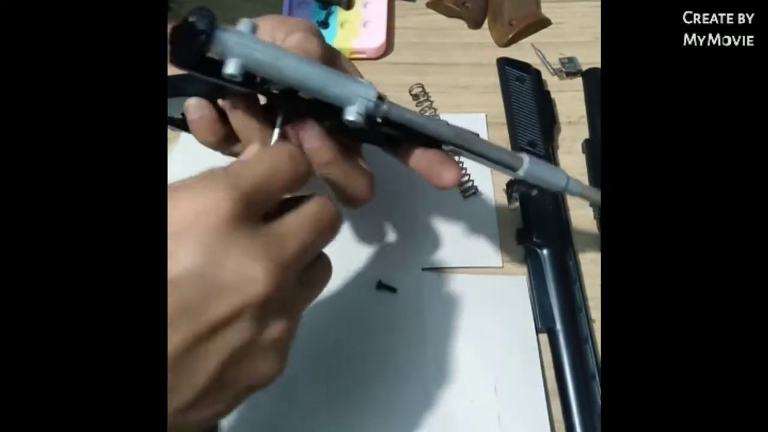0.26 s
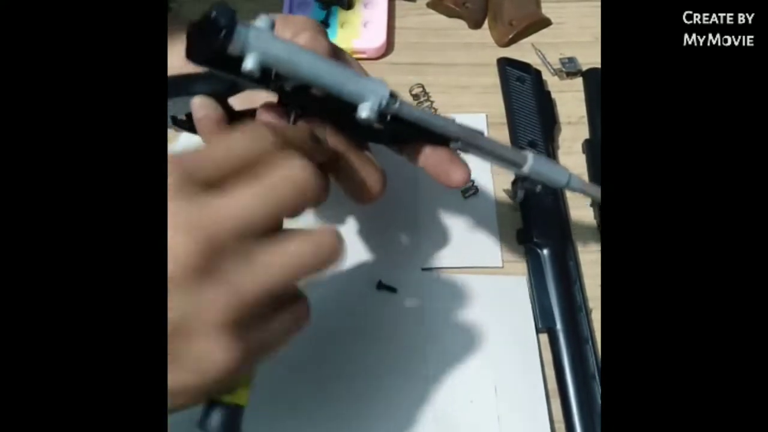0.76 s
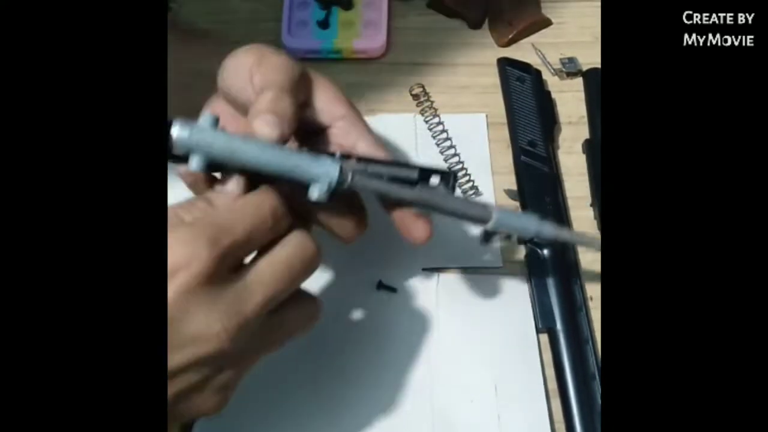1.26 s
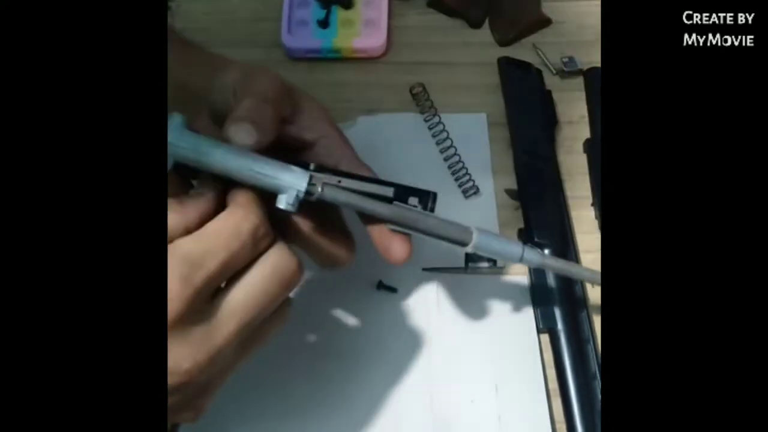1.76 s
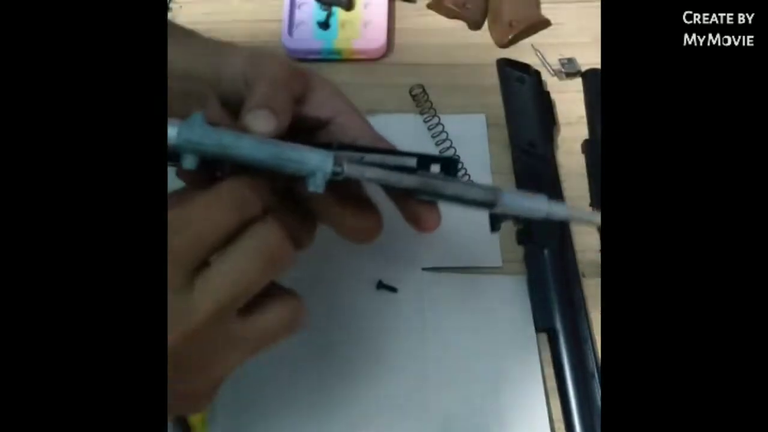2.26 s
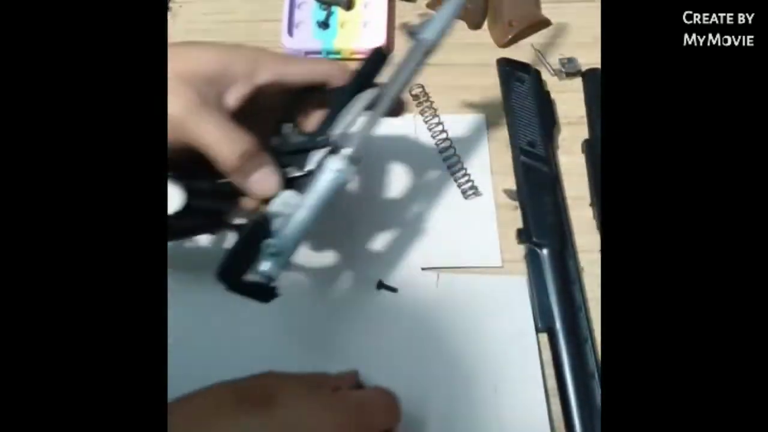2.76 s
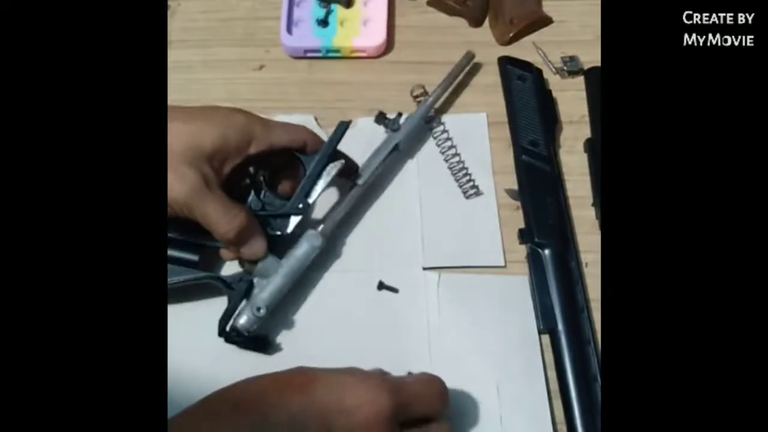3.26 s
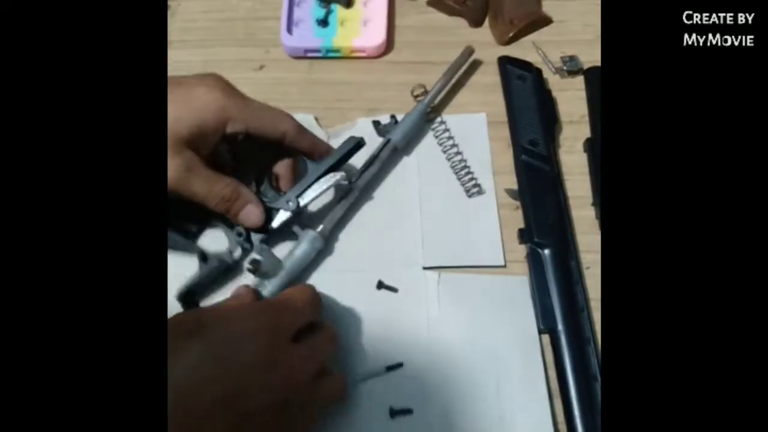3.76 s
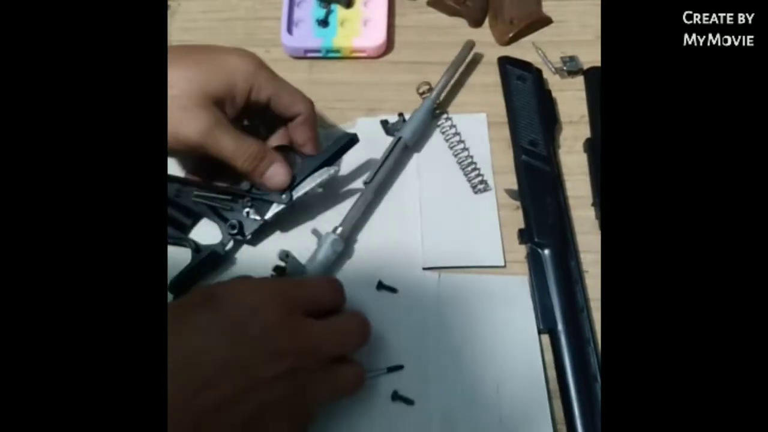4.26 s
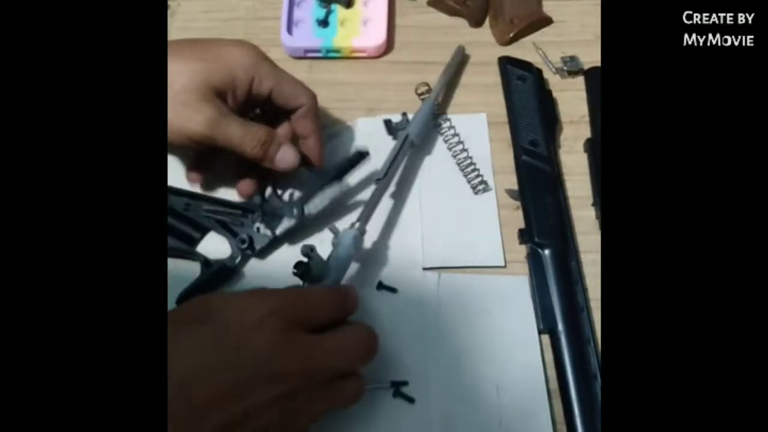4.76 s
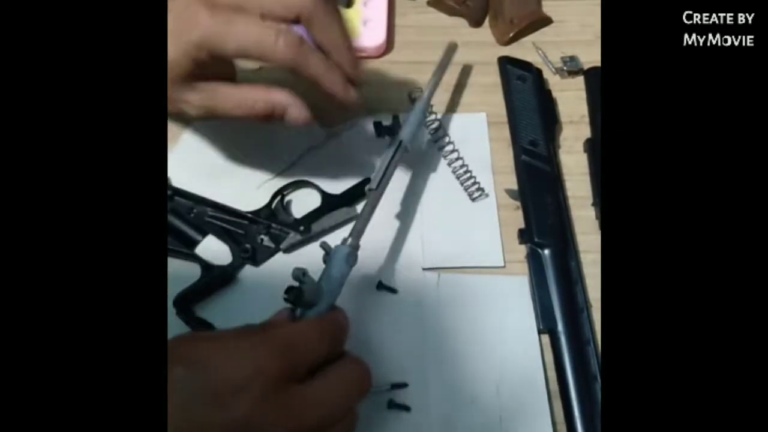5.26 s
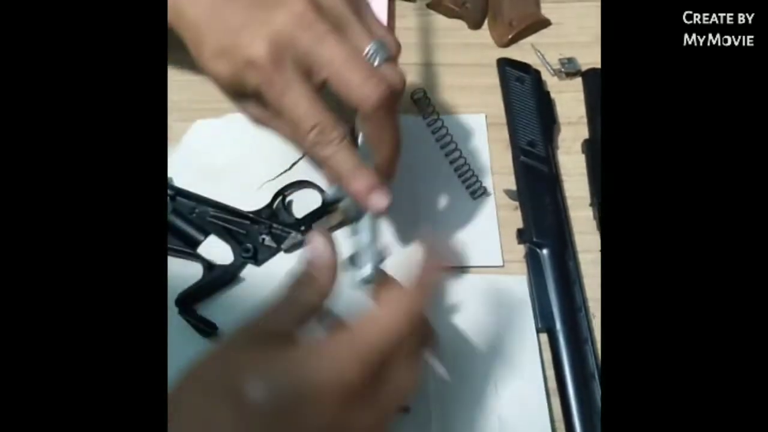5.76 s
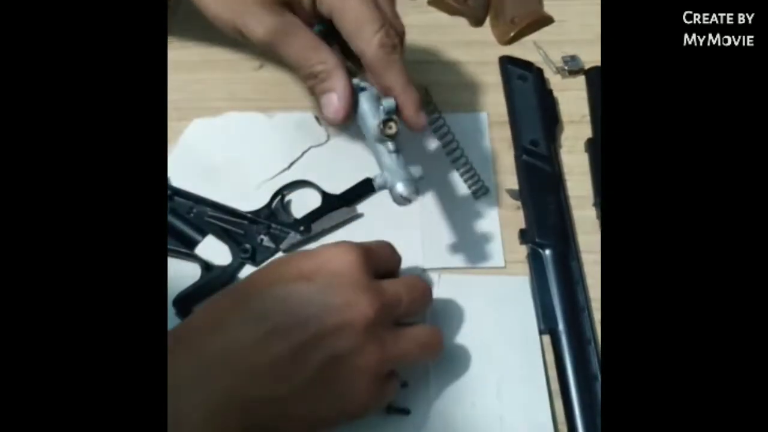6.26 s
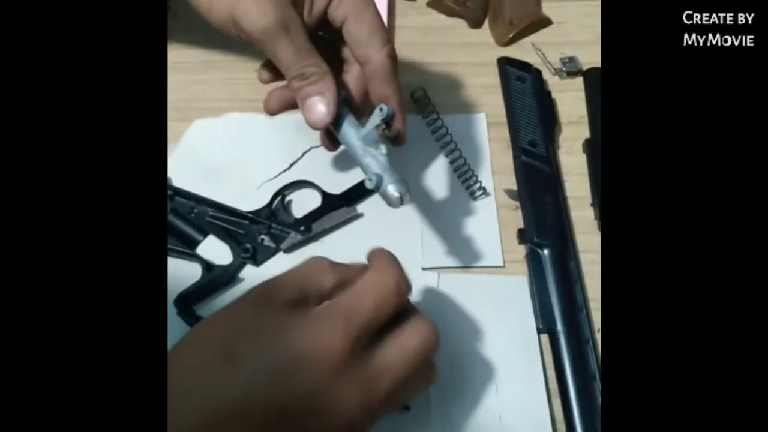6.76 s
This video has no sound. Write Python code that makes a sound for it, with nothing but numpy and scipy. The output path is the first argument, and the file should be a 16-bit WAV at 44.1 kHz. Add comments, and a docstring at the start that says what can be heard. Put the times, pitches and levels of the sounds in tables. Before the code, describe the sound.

Close phone microphone in a small room. Faint hiss and a distant low motor hum sit under tiny metallic ticks. Around three seconds, cast-metal and plastic parts clack and rattle brightly, ending with a dull thump on the wooden table. After a quiet gap, a hard, sharp knock with a brief plastic rattle follows, then only sparse, barely audible tinks.

```python
"""Handling metal parts at a table

Hands turn cast-metal, steel and plastic parts over a wooden table in a small room, close to a phone.
Knocks, rattles and thumps are short cracks plus fading modes; screws and springs tink as single fading tones.
A room tail of fading noise follows them. Shaped noise makes the air and hiss, wavering tones the far-off motor.
The phone's noise suppressor holds the background down and opens for sounds that stand out."""
import sys
import numpy as np
from scipy import signal
from scipy.fft import rfft, irfft
from scipy.io import wavfile
from scipy.ndimage import uniform_filter1d

SR = 44100
rng = np.random.default_rng(int(sys.argv[2]) if len(sys.argv) > 2 else 0)


def wav_out(sig):
    """Save sig, one row per channel (or a flat mono array), as 16-bit PCM at SR to the path in sys.argv[1]."""
    wavfile.write(sys.argv[1], SR, np.round(np.clip(np.atleast_2d(sig).T, -1, 1) * 32767).astype(np.int16))


def gain_from_db(level_db):
    """Convert decibel levels to linear amplitude factors (20 dB per decade)."""
    decades = np.asarray(level_db, float) / 20
    return 10 ** decades


N = 310023  # length in samples, about 7 s

# colour of the room air and hiss; the faint chirps in the hiss use it too: (f/Hz, relative level/dB)
AIR_COLOUR = [(20, -24), (40, -17), (65, -7), (125, -8), (165, -20), (250, -22), (400, -22.5), (700, -19.5),
              (1450, -22), (1650, -25), (2600, -22), (4000, -25.5), (5650, -23), (7180, -29.5), (8700, -24),
              (10500, -32), (14500, -47)]
DUCK_DB = 9.0  # how far the suppressor can pull a band down; the background is made this much louder first


def along(table, hz):
    """Reads a (f/Hz, value) table with frequency on a log axis, as the ear hears pitch."""
    f, value = np.transpose(table)
    return np.interp(np.log(np.maximum(hz, 1)), np.log(f), value)


def add(out, s, sound):
    """Mixes a sound in, starting at s seconds."""
    i = max(int(s * SR), 0)
    out[i:i + len(sound)] += sound[:N - i]


def knocks():
    """Each blow rings the bodies it reaches; a plastic rattle also leaks a fixed share into the metal."""
    # knocks with plastic, cast-metal and steel shares:
    # (t/s, plastic frame peak/dB, casting peak/dB, steel peak/dB, loudest ring f/Hz)
    part_knocks = [(2.0023, -67, -43.5, -30, 9800), (2.8885, -25, -31, -59.5, 1760),
                   (3.0444, -24, -16, -28, 4020), (3.0526, -24, -16.5, -26, 5130),
                   (3.1305, -31, -19.5, -36.5, 5890), (3.1834, -43, -34, -57.5, 5090),
                   (3.2367, -14, -36, -30, 1780), (3.2549, -28, -31, -35, 2380),
                   (3.2654, -38, -29, -28, 6060), (3.2987, -39, -32, -35.5, 6140),
                   (3.3366, -45, -44, -47.5, 6120), (3.7109, -67.5, -66, -45.5, 10240),
                   (4.7816, -17, -14, -25, 2800), (4.7842, -23, -22, -22.5, 1800)]
    # the plastic frame rattles: (t/s, peak/dB, loudest ring f/Hz)
    frame_rattles = [(2.8767, -31, 1828), (2.8927, -32, 1528), (2.9157, -38, 1798), (3.0847, -34, 1960),
                     (3.1457, -32, 3012), (3.2777, -33, 2180), (3.2897, -30.5, 1852), (3.3667, -26, 2168),
                     (3.4057, -19.5, 1780), (3.4167, -23.5, 1776), (3.4297, -30, 1749), (3.4687, -28, 2300),
                     (3.5047, -38, 2800), (4.7977, -22, 1811), (4.8047, -22, 2200), (4.8197, -24, 2600),
                     (4.8387, -25, 3038), (4.8627, -28.5, 1810)]
    # low wooden part of the knocks, and some thumps of its own: (t/s, peak/dB, loudest ring f/Hz)
    table_thumps = [(2.8924, -53, 430), (2.9157, -48, 430), (2.9500, -50, 430), (3.0527, -44, 300),
                    (3.0845, -44.5, 250), (3.2369, -36, 300), (3.2655, -35, 480), (3.2989, -38, 480),
                    (3.3367, -50, 480), (3.3667, -46, 480), (3.4556, -21.5, 230), (3.4686, -19, 440),
                    (3.4900, -33, 110), (3.4897, -25, 240), (3.5257, -37, 220), (3.5047, -36, 330),
                    (3.6297, -47, 215), (4.7817, -26, 880), (4.7841, -12, 850), (4.7907, -28, 125),
                    (4.7977, -32, 1250), (4.8048, -36, 300)]
    # modes of the plastic frame: (f/Hz, level/dB, time to fall 60 dB/s)
    frame_modes = [(1550.5, -5, .018), (1800, 0, .018), (2180, -2.5, .02), (2380, -3, 0.026),
                   (2800, -3, 0.017), (3077, -5, .018), (3454, -7, .018)]
    # modes of the wooden table: (f/Hz, level/dB, time to fall 60 dB/s)
    table_modes = [(74.3, -11, 0.32), (120, -11, .24), (220, -2.5, .09), (250, -3, .08), (339.8, -9, .06),
                   (440, -2, 0.052), (491.04, -2.5, .05), (674.6, -10, .02), (859, -4, .022),
                   (1187.5, -9, 0.017)]
    # modes of the cast metal: (f/Hz, level/dB, time to fall 60 dB/s)
    casting_modes = [(3864, -2.5, 0.03), (4350, -3, .025), (4892.6, -3, .025), (5156, -2, .03),
                     (5516, -3, 0.03), (6120, -2, .06), (6640, -4, 0.041), (6886, -5.5, .03),
                     (7420, -7, .03), (7710, -8, .03)]
    # modes of the steel: (f/Hz, level/dB, time to fall 60 dB/s)
    steel_modes = [(8398, -2, 0.078), (8686, 0.5, .07), (8934, -3.5, .05), (9800, 0, .07),
                   (10285, -3, 0.05), (10630, -7, .05), (11220, -13, 0.035), (11780, -12, .04),
                   (12410, -10, .05), (13500, -10, .04)]
    # how table, frame, casting and steel are struck:
    # (contact/s, crack fade/s, crack level/dB, loss away from the loudest ring/dB per octave)
    contacts = [(.002, .005, -8, 8), (.001, .0035, -2, 9.5), (0.0009, .005, 0.03, 4.5),
                (0.00097, .003, -4, 1.5)]
    casting_leak_db, steel_leak_db = -15, -28  # relative to the rattle itself

    out = np.zeros(N)
    blows = [(s, table_modes, contacts[0], db, hz) for s, db, hz in table_thumps]
    rattles = [(s, db, db + casting_leak_db, db + steel_leak_db, hz) for s, db, hz in frame_rattles]
    bodies = (frame_modes, casting_modes, steel_modes)
    for s, *levels, hz in part_knocks + rattles:
        blows += [(s, modes, contact, db, hz) for modes, contact, db in zip(bodies, contacts[1:], levels)]
    chances = rng.standard_normal((len(blows), 3, 10))
    noises = rng.standard_normal((len(blows), 8192))
    for (s, modes, contact, db, hz), chance, noise in zip(blows, chances, noises):
        add(out, s, gain_from_db(db) * ring(modes, contact, chance, noise, hz))
    return out


def ring(modes, contact, chance, noise, ring_hz, scatter_db=2.5, favour_db=3.0, detune=.03):
    """One blow of peak 1: a crack in the body's band plus its modes, strongest near the loudest ring."""
    hz, db, t60 = np.transpose(modes)[:, :, None]
    contact_s, crack_s, crack_db, slope_db = contact
    share, shift, start = chance[:, :len(modes), None]
    t = np.arange(len(noise)) / SR
    near = np.exp(-(np.log(hz / ring_hz) / .05) ** 2)  # 1 for a mode at the loudest ring, 0 far from it
    db = db - slope_db * abs(np.log2(hz / ring_hz))
    # the crack is noise shaped by the mode levels, with steep edges outside the body's band
    quiet_db = db.min() - 40
    colour = [(.8 * hz.min(), quiet_db), *zip(hz[:, 0], db[:, 0]), (1.15 * hz.max(), quiet_db)]
    noise_gain = gain_from_db(along(colour, np.fft.rfftfreq(len(t), 1 / SR)))
    crack = irfft(rfft(noise) * noise_gain, len(t)) * np.exp(-t / crack_s)
    # grip and contact point change each mode's share and pitch at every blow
    db = db + scatter_db * share + favour_db * near
    hz = hz * (1 + detune * shift) * (1 - near) + ring_hz * near
    tones = gain_from_db(db - 60 * t / t60) * np.sin(2 * np.pi * hz * t + 0.834 * start)
    wave = tones.sum(axis=0)
    wave = wave / abs(wave).max() + gain_from_db(crack_db) * crack / abs(crack).max()
    wave = wave * (1 - np.exp(-(t / contact_s) ** 2))  # a longer contact starts more softly
    return wave / abs(wave).max()


def tinks():
    """Single tones with a quick swell and a wavering fade: clear tinks, loose parts and faint chirps."""
    # the clearest tinks: (t/s, f/Hz, level/dB, time to fall 10 dB/s); a fall below zero stays silent
    clear_tinks = [(0.081, 432, -50, .02), (0.083, 1343, -56, .012), (0.157, 1377, -58, .019),
                   (0.223, 1355, -54, .04), (0.293, 9850, -54, .015), (0.286, 6064, -40.5, 0.0137),
                   (0.39, 862, -57, .012), (0.424, 12834, -55, .012), (0.424, 1840, -57, .012),
                   (0.422, 495, -59, .041), (0.415, 5978, -41, 0.0096), (0.425, 7210, -52, 0.0047),
                   (0.444, 6005, -41, 0.0125), (0.505, 2673, -60, .049), (0.663, 1175, -57, 0.0281),
                   (0.836, 555, -47, .014), (0.83, 7900, -60, .023), (1.035, 2752, -55, 0.0647),
                   (1.088, 2686, -56, .017), (1.12, 6055, -55.5, 0.01), (1.255, 1384, -57, .023),
                   (1.277, 319.5, -58.5, 0.1723), (1.374, 330, -48, .014), (1.444, 644.7, -48, 0.0084),
                   (1.575, 2729, -46.5, 0.0076), (1.576, 556.4, -53.5, 0.0389),
                   (1.636, 2768, -55.5, 0.0215), (1.659, 2732, -49.5, 0.0056), (1.715, 2716, -57.5, 0.0253),
                   (1.776, 2717, -55, .015), (2.005, 6600, -52, .02), (2.064, 2659, -60, .025),
                   (2.152, 438.4, -50.5, 0.016), (2.599, 836.3, -58, .011), (2.75, 1111, -53, .011),
                   (3.022, 3200, -47, 0.0034), (3.245, 6120, -39, .03), (3.262, 6080, -36, .015),
                   (3.285, 6140, -37, .02), (3.299, 6140, -35, .02), (3.455, 9870, -44.5, 0.0378),
                   (3.643, 9913, -51.5, -0.0122), (3.856, 2685, -54, .013), (4.126, 2662, -62, .026),
                   (5.753, 2658, -64, .04), (5.962, 1694, -59, .022), (0.935, 2755, -61, .022),
                   (1.524, 2733, -61, .03), (5.261, 1370, -61, .026), (4.673, 420.4, -51, 0.0292),
                   (4.757, 405.2, -49.5, 0.0318), (6.03, 413.6, -51.5, 0.0271), (6.073, 6095, -54, 0.0229),
                   (6.547, 428, -48.5, 0.0334), (7.025, 482, -51.5, 0.26)]
    # small parts that fingers keep waking: (f/Hz, touches per second, base level/dB)
    loose_parts = [(1369.5, 1, -67), (2704, 2, -67), (3401, 1, -65), (4332, 1, -65), (6040, 1.5, -64),
                   (9870, 1, -64)]
    # random faint chirps in the hiss, as a noise suppressor leaves:
    # per second, base level added to the air's colour
    chirp_rate, chirp_db = 60, -46.0

    out = np.zeros(N)
    rows = [*clear_tinks]
    rows += [*random_tones(int(chirp_rate * N / SR), lambda u: 900 * 14 ** u,
                           lambda hz: chirp_db + along(AIR_COLOUR, hz))]
    for f, rate, base_db in loose_parts:
        rows += [*random_tones(int(rate * N / SR), lambda u: f * (1 + .03 * (u - .5)), lambda hz: base_db)]
    chances = rng.uniform(0, 2 * np.pi, (len(rows), 2))
    for (s, hz, db, fall), (phase, beat) in zip(rows, chances):
        t = np.arange(int((6 * fall + .02) * SR)) / SR
        swell = 1 - np.exp(-(t / .004) ** 2)
        waver = 1 + .25 * np.cos(2 * np.pi * 45 * t + beat)
        shape = swell * gain_from_db(-10 * t / fall) * waver
        add(out, s - .007, gain_from_db(db) * shape * np.sin(2 * np.pi * hz * t + phase))  # starts 7 ms ahead
    return out


def random_tones(count, hz, db, spread_db=6):
    """Rows like the tink table at random times; hz turns a 0-1 draw into pitch, db a pitch into level."""
    # the random tones get quieter along the scene: (t/s, change of level/dB)
    busy = [(0, 0), (1.8, 0), (2.2, -6), (4, -6), (7.03, -9)]
    when, pitch, size, fade = rng.uniform(size=(count, 4)).T
    s = when * N / SR
    level_db = db(hz(pitch)) + spread_db * size + np.interp(s, *np.transpose(busy))
    return np.transpose([s, hz(pitch), level_db, .008 + .025 * fade ** 2])


def room(x):
    """Diffuse room tail: noise in which every band dies away at its own rate."""
    # how long the room rings: (f/Hz, time to fall 60 dB/s)
    room_t60 = [(100, 0.51), (400, .36), (1500, 0.3255), (5000, .32), (12000, .28)]
    # colour and strength of the tail: (f/Hz, level/dB)
    room_colour = [(100, -8), (500, -9), (1500, -6), (3000, -5), (10000, -6)]
    gap_s = .003  # silence before the tail, and then the time it takes to build up

    hz, t, z = signal.stft(rng.standard_normal(SR), SR, nperseg=256)
    bands = z * gain_from_db(-60 * t / along(room_t60, hz)[:, None])
    coloured_bands = bands * gain_from_db(along(room_colour, hz))[:, None]
    flat = signal.istft(bands, SR, nperseg=256)[1]
    coloured = signal.istft(coloured_bands, SR, nperseg=256)[1]
    build = np.clip(np.arange(len(flat)) / SR / gap_s - 1, 0, 1)
    # the uncoloured tail sets the scale, so the colour table also sets the strength
    tail = coloured * build / np.sqrt(np.sum((flat * build) ** 2))
    return signal.fftconvolve(x, tail)[:N]


def background():
    """Room air and microphone hiss as shaped noise, and a far motor as wavering sine tones."""
    # motor lines, before the lift by DUCK_DB: (f/Hz, level/dB)
    motor_lines = [(70, -72), (96.9, -79), (120, -70.5), (210, -82), (280, -88), (350, -81), (420, -80.5),
                   (490, -82), (560, -85.5), (630, -84), (770, -90)]
    air_db = -71  # rms, before the lift by DUCK_DB

    air_gain = gain_from_db(along(AIR_COLOUR, np.fft.rfftfreq(N, 1 / SR)))
    air = irfft(rfft(rng.standard_normal(N)) * air_gain, N)
    air = gain_from_db(air_db) * air / np.sqrt(np.mean(air ** 2))
    air = air * gain_from_db(.8 * walk(3.))  # the air level drifts slightly
    t = np.arange(N) / SR
    hum = np.zeros(N)
    for hz, db in motor_lines:
        level = gain_from_db(db + hz / 150 * walk(7.))  # the higher motor lines waver more
        hum += level * np.sin(2 * np.pi * hz * t + .4 * walk(6.))
    return (air + hum) * gain_from_db(DUCK_DB)


def walk(rate):
    """Slow random drift: rate new levels per second, smoothed twice."""
    k = int(SR / rate)
    levels = rng.standard_normal(N // 1000)
    steps = np.repeat(levels, k)[:N]
    return uniform_filter1d(uniform_filter1d(steps, k), k)


def scene():
    """Knocks and tinks, heard directly and through the room, over the background."""
    hard, light = knocks(), tinks()
    tail = room(hard + gain_from_db(-8.0) * light)  # the light sounds feed the room 8 dB weaker
    return (hard + light + tail + background())[None]


def suppress(x, local_db=7., soft_db=1.5, broad_db=12.5, broad_share=.55):
    """Noise suppressor: bands open above their usual level; one strong band part-opens all the others."""
    hz, t, z = signal.stft(x, SR, nperseg=1024, noverlap=896)
    power = uniform_filter1d(uniform_filter1d(abs(z) ** 2, size=4, axis=0), size=7, axis=1)
    usual = np.median(power, axis=1, keepdims=True)
    over_db = 10 * np.log10(power / usual)
    local = 1 / (1 + np.exp((local_db - over_db) / soft_db))  # 0 closed, 1 open
    strongest_db = np.clip(over_db[hz < 14000], 0, 18).max(axis=0)
    strongest_db = uniform_filter1d(strongest_db, size=9)
    broad = min(broad_share, 1) / (1 + np.exp((broad_db - strongest_db) / 1.1))
    gain = gain_from_db(-DUCK_DB * (1 - local) * (1 - broad))
    return signal.istft(z * gain, SR, nperseg=1024, noverlap=896)[1][:N]


def roll_off(x):
    """The treble ends steeply here."""
    return signal.sosfilt(signal.butter(12, 14920, fs=SR, output="sos"), x)


def record(dry):
    """A small microphone loses the deep bass and the top; then the noise suppressor works."""
    low_hz, top_hz = 54.3, 14500.0
    bass_cut = signal.butter(2, low_hz, "highpass", fs=SR, output="sos")
    top_cut = signal.ellip(8, .2, 60, top_hz, fs=SR, output="sos")
    mic = signal.sosfilt(top_cut, signal.sosfilt(bass_cut, dry[0]))
    mix = suppress(mic)[None]
    return roll_off(mix)


dry = scene()
out = record(dry)
wav_out(out)
```